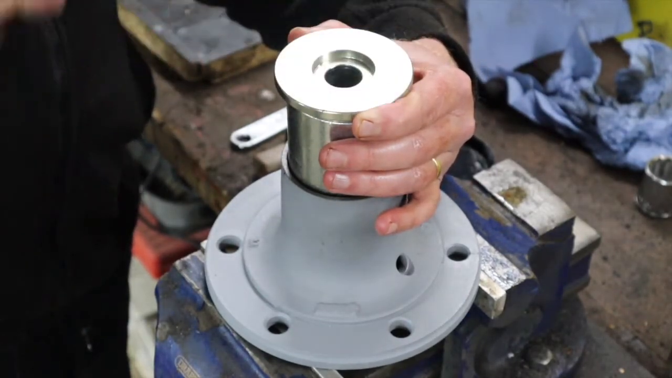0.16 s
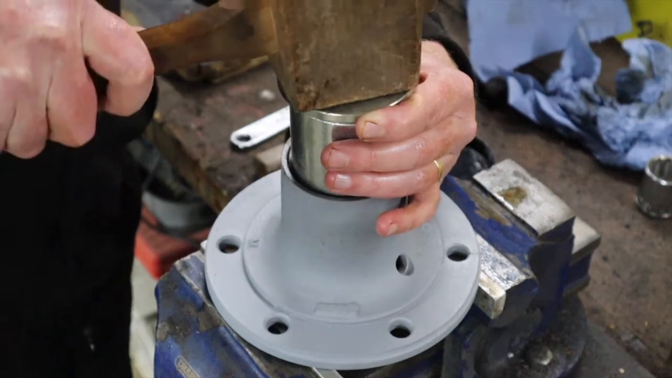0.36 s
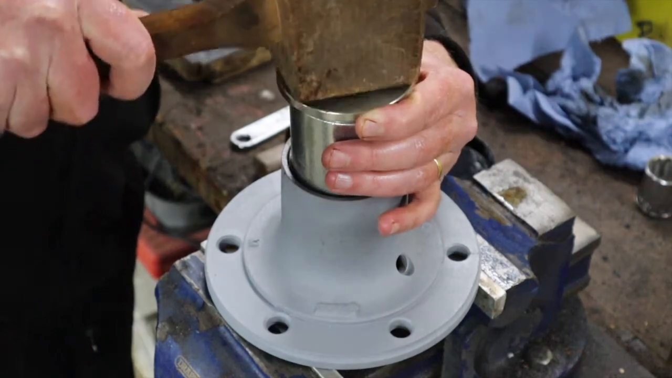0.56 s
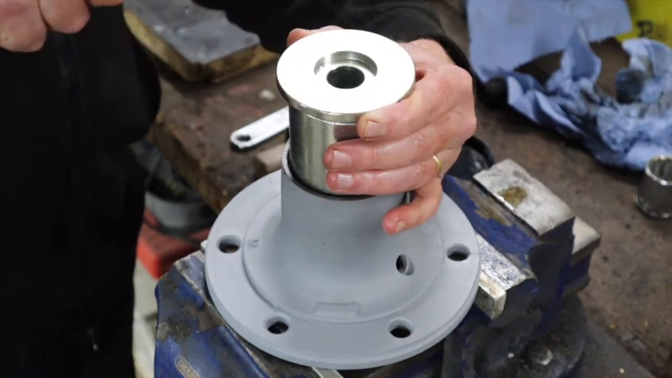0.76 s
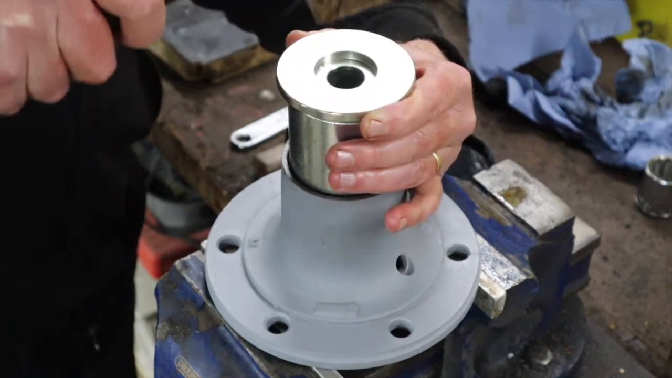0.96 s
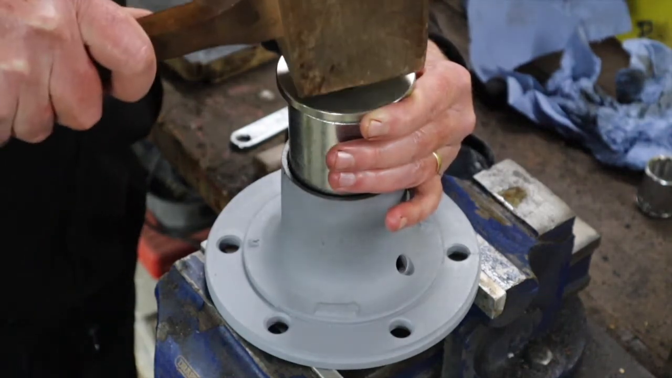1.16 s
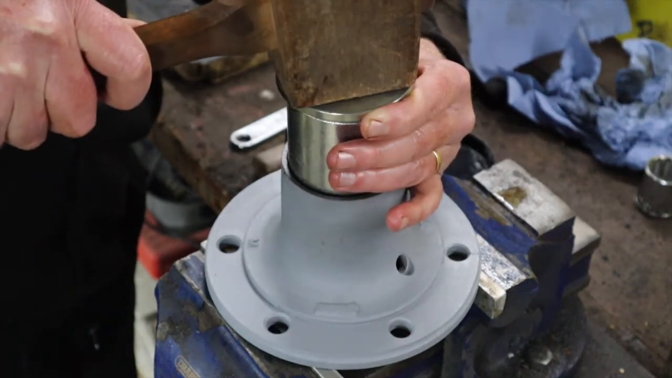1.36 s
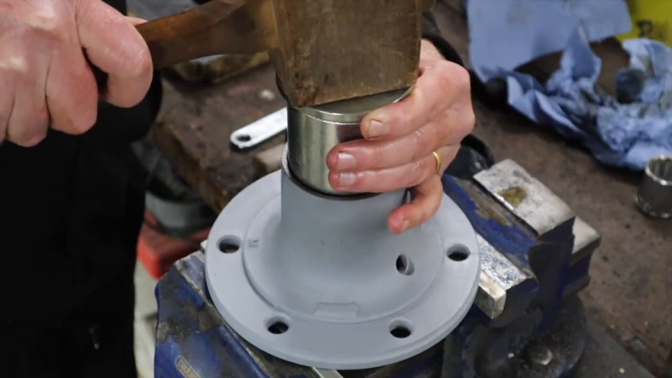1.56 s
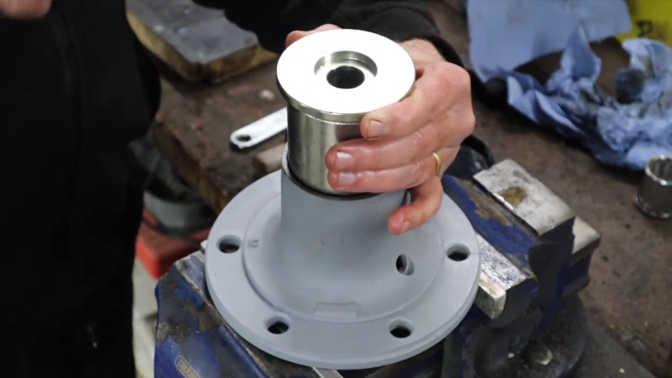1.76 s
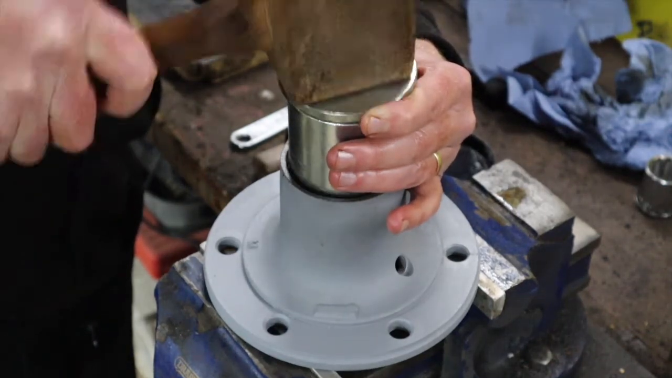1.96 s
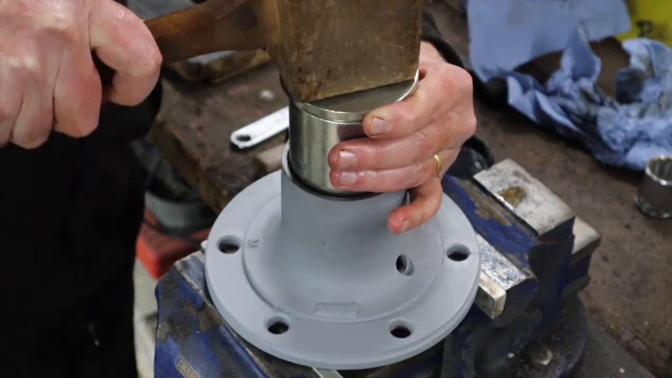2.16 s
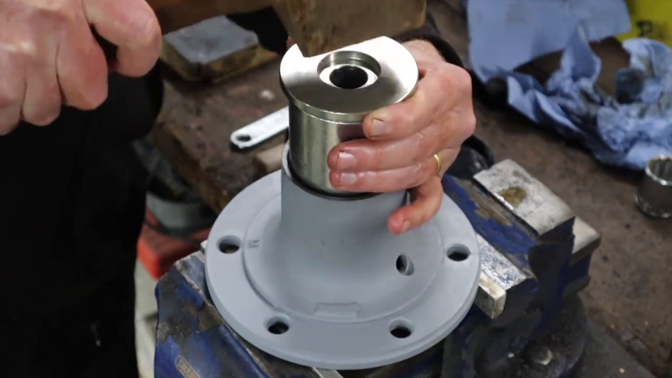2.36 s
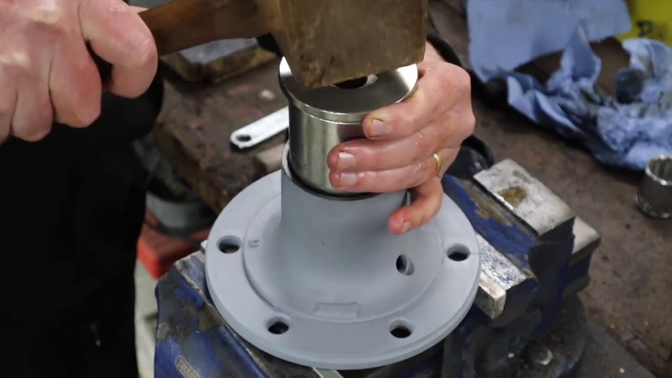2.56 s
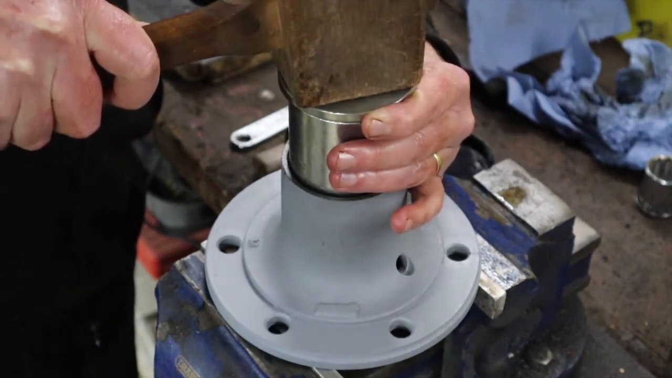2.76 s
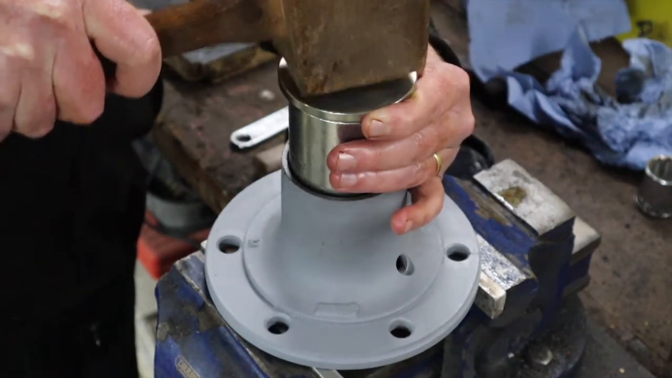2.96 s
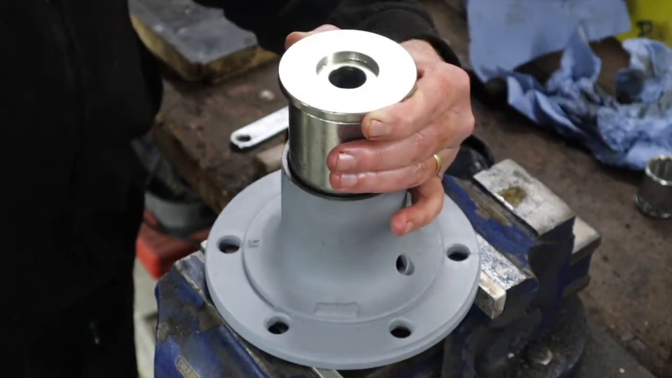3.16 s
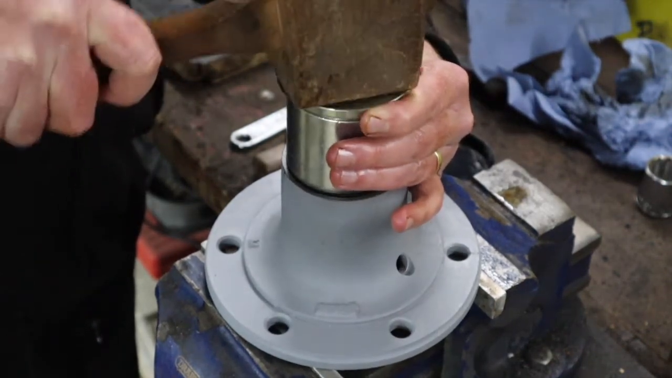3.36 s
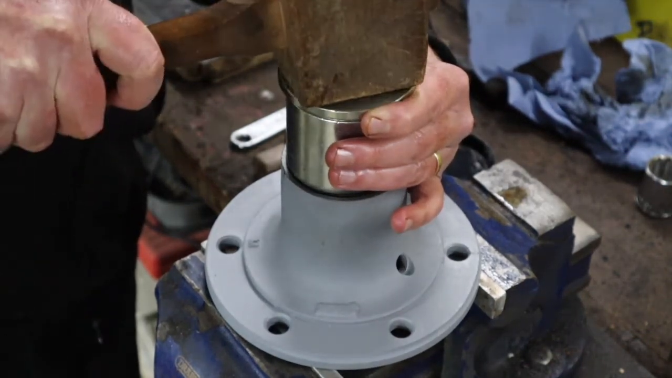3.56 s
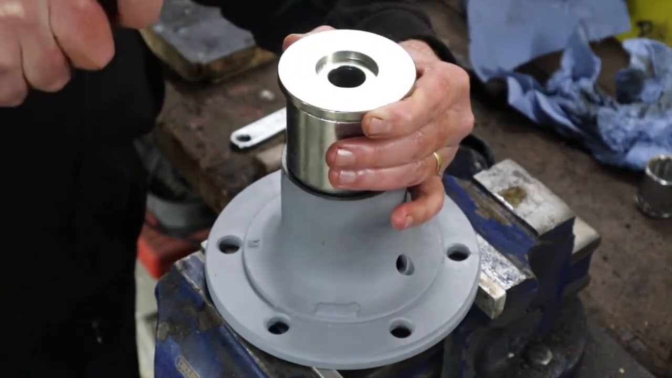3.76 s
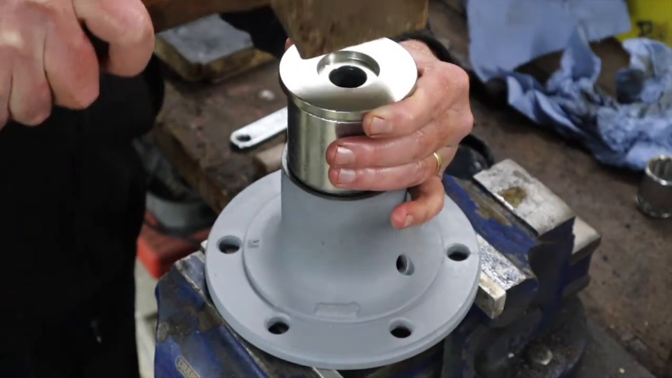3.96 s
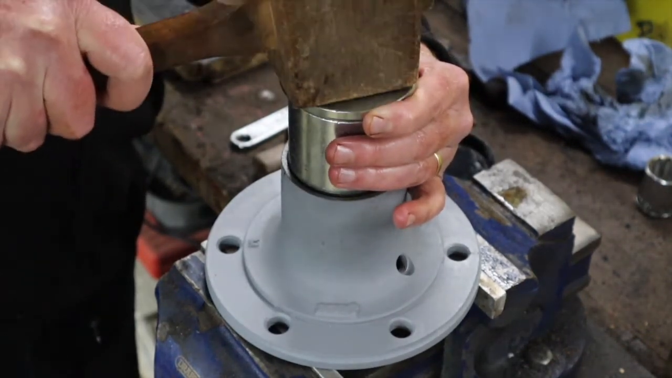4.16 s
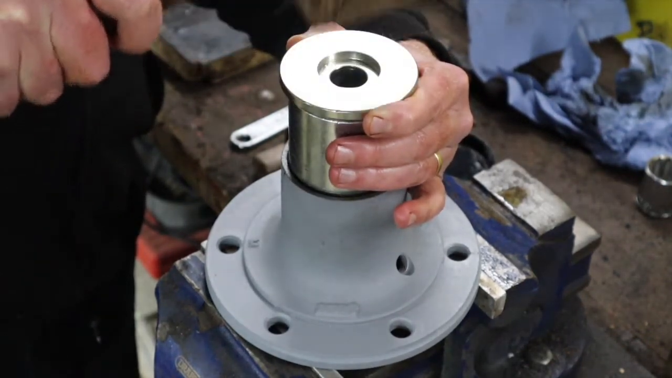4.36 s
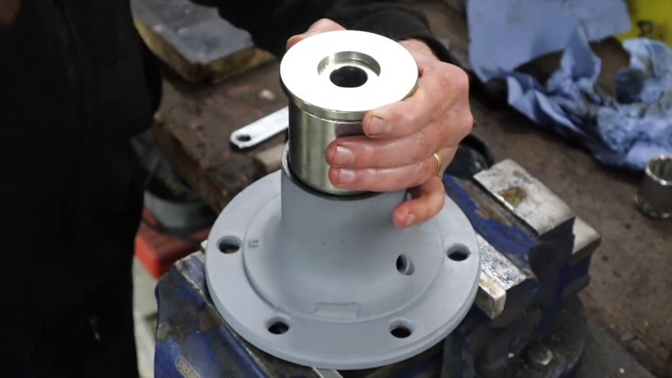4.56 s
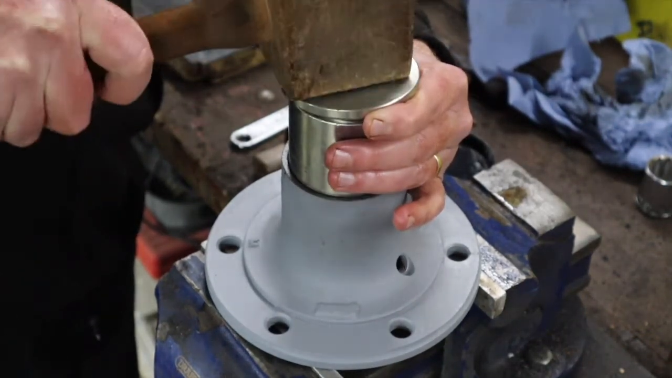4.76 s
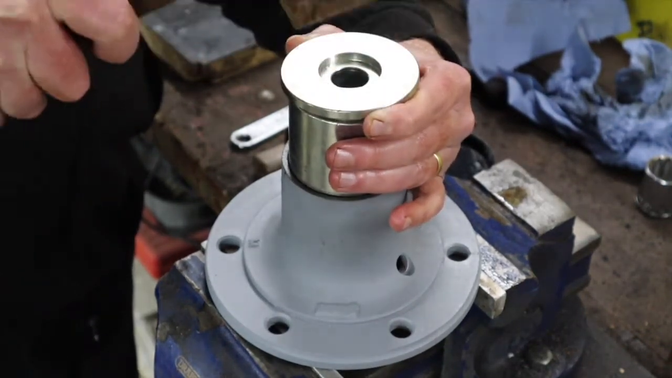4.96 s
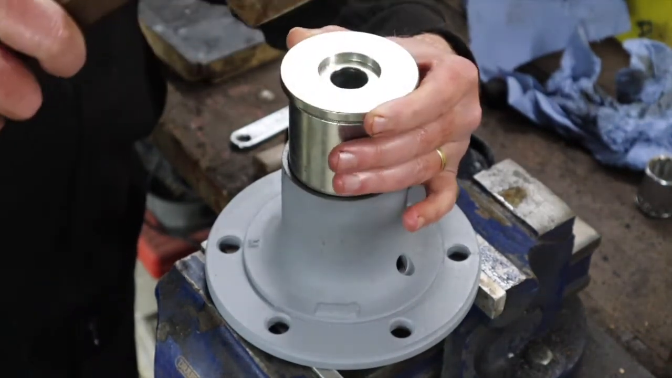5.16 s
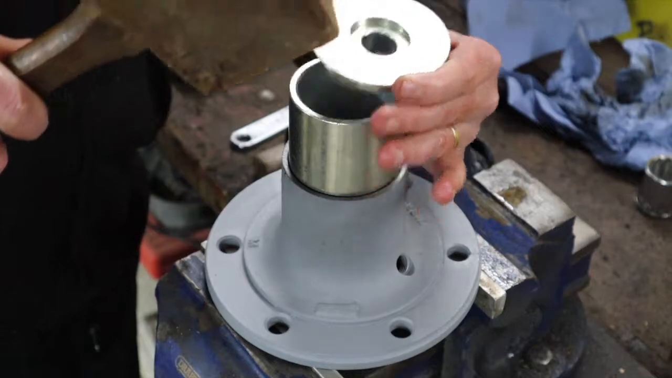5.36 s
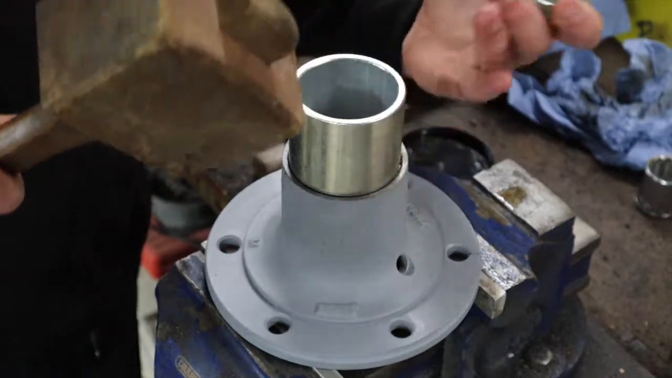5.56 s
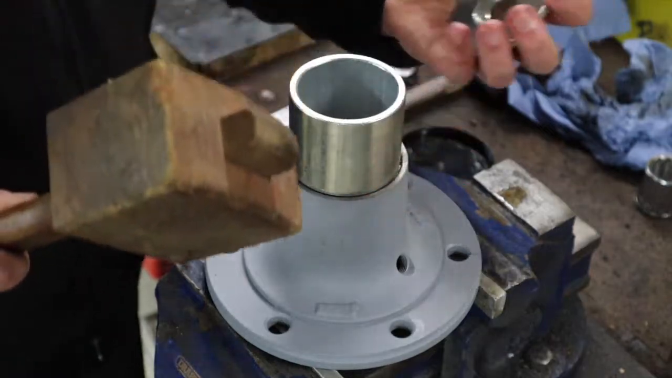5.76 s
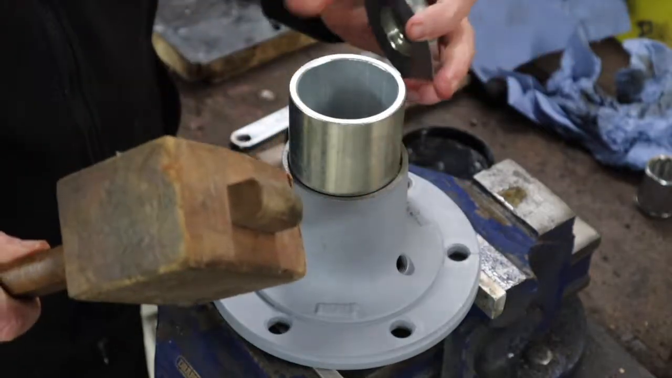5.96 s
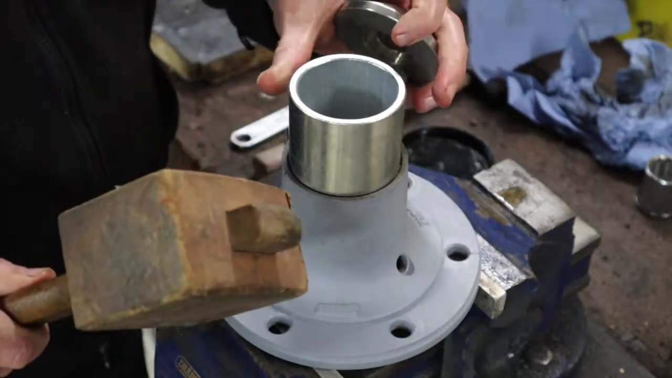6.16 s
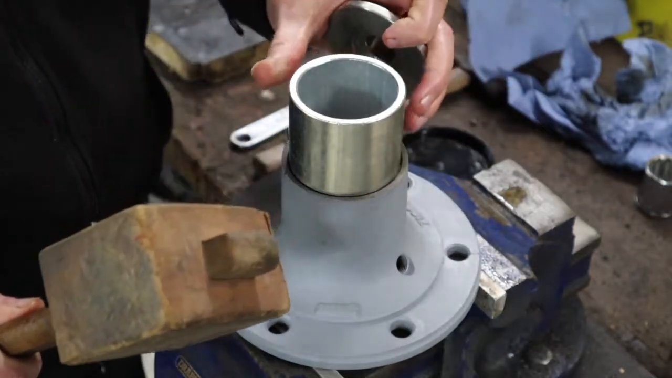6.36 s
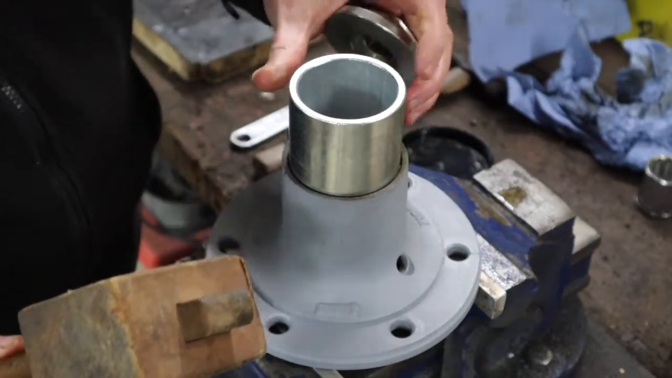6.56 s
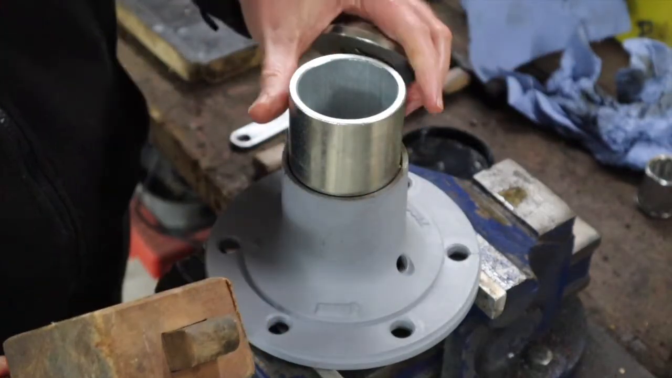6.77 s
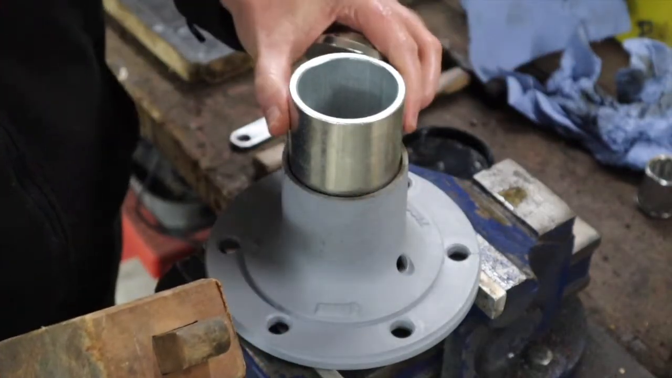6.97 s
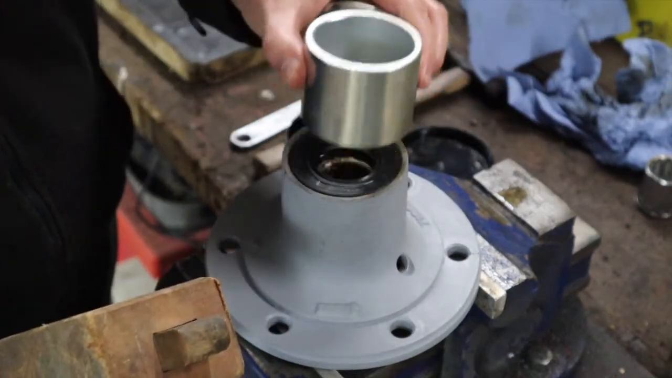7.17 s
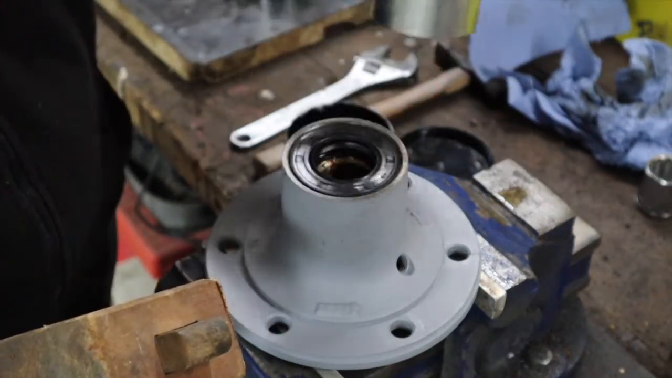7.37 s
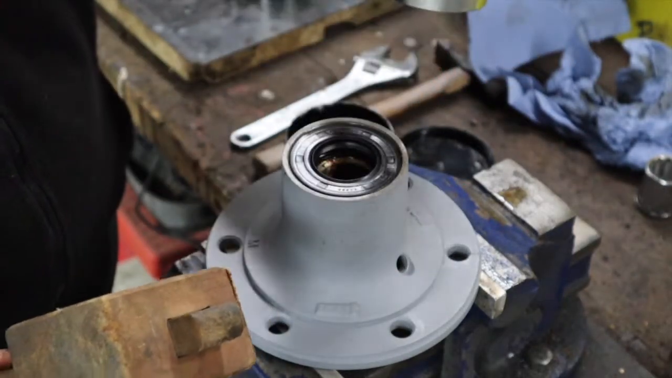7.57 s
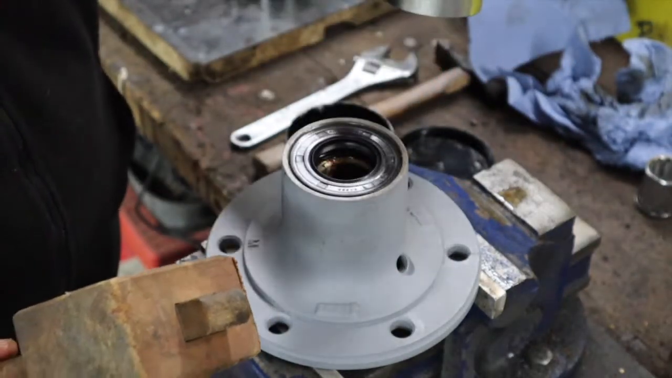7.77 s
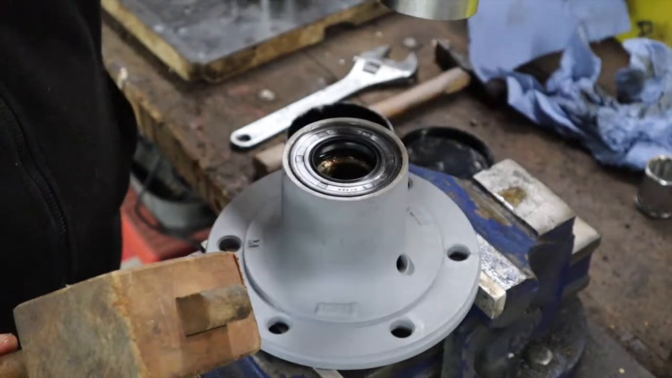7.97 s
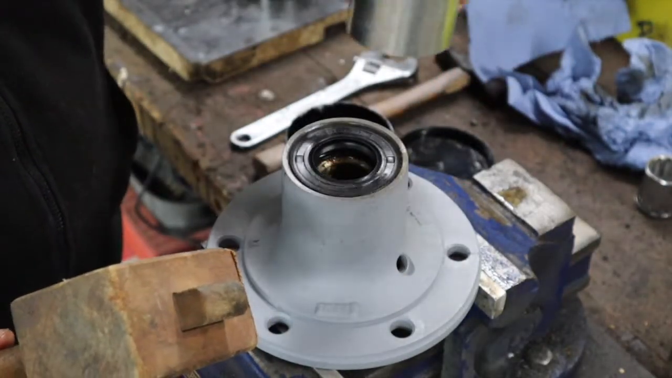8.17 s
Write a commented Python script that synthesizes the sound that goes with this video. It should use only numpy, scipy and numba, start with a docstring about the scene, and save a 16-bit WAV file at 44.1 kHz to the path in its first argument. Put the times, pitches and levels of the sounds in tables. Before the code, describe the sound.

Close and mono, heavy wood-on-steel blows burst out loud and slightly distorted, each ducking the background before the room decay swells up. Much softer taps fall between them. After the last double-edged hit, a loose steel cap clinks brightly, cloth rustles, a low motor tone hums briefly, and the steel tube comes free with a short rub and light ringing ticks. Faint mains hum and fan air remain.

```python
"""Workshop bench: a wooden mallet drives a tubular steel drift into a hub in a vice, heavy blows among light taps.
Contacts are damped modes plus coloured noise, each with a room answer; the loose drift then clinks and rubs a seal.
Sleeves rustle as shaped noise over mains hum, fan air and a brief motor tone.
Gain control ducks on heavy blows, just too late to stop clipping, and the room swells as it recovers."""
import sys
import numpy as np
from scipy import signal
from scipy.fft import rfft, irfft, next_fast_len
from scipy.io import wavfile
from numba import njit

SR = 44100
rng = np.random.default_rng(int(sys.argv[2]) if len(sys.argv) > 2 else 0)


def master(y):
    """Save y as 16-bit WAV."""
    cut = np.clip(np.atleast_2d(y).T, -1, 1)
    pcm = np.round(cut * 32767)  # scale
    wavfile.write(sys.argv[1], SR, pcm.astype(np.int16))


N = 362502

# hum of a mains-driven machine, before the background trim: pitch_hz, level_db
HUM_PARTIALS = [(49.9, -44), (150, -52), (249.7, -60), (350, -69.5), (450, -71)]
# fan air colour: freq_hz, level_db
AIR_SPECTRUM = [(20, -16), (60, 0.5), (110, -4.5), (200, -6.5), (330, -12), (600, -12), (860, -6),
                (1300, -17.5), (3300, -20.5), (6000, -34), (9000, -37.5), (15500, -36.5)]
# arm movements that rustle a sleeve: start_s, length_s, level_db
RUSTLES = [(0, .12, -71), (1.043, .15, -81), (3.049, .2, -71), (4.501, .13, -58), (6.2, 1.3, -68)]
# cloth colour: freq_hz, level_db
CLOTH_SPECTRUM = [(300, -24), (1500, -0.5), (4000, 2.5), (7000, -5), (10000, -12.5), (15000, -22)]
# mallet contacts: start_s, strength_db, cutoff_hz, drift_db, cap_db
BLOWS = [(0.2363, 17, 9000, -1, 4), (1.2940, -33, 1680, -11, 0), (1.9675, 21, 7420, -1.5, 1),
         (2.7515, -17, 4307, -11.5, -1.5), (2.7625, -31.5, 9000, 2, 0), (3.318, 20, 8570, 2, 2.5),
         (4.1011, -13.5, 3000, -5, 4.5), (4.6400, 21, 7700, -13, -4.5), (4.6629, 7, 8500, -4, -2.5)]
# wall ovals of the drift in pairs, ends opposed (1) or together (-1): pitch_hz, level_db, t60_s at grip 1, twist
DRIFT_MODES = [(3296, -11, .2, -1), (3325, -16, .07, -1), (4612, -15, .15, 1), (4690, -5, .025, 1),
               (9140, -19, .15, -1), (10955, -8, .11, 1), (11185, -23, .12, -1)]
# hub, seal, vice and bench, damped by mallet and hand: pitch_hz, level_db, t60_s at grip 1
HUB_MODES = [(58, -29, .25), (120, -31, .12), (610, -23, .035), (1610, -17, .015), (835, -14, .045),
             (925, -14, .045), (3370, -14, .045), (3480, -17, .035), (4810, -9, .022), (4990, -10, .03)]
# cap, driven against the tube: pitch_hz, level_db, t60_s at grip 1
CAP_MODES = [(2741, 0, 0.027), (2850, -8.5, 0.05), (2996, -13, 0.0097), (3324, -2, 0.038),
             (6466, -6.5, 0.017), (10960, -6, 0.06)]
# colour of the dense, short-lived modes: freq_hz, level_db
CRACK_SPECTRUM = [(25, -4), (90, -1.5), (300, -3), (1200, -1.5), (2400, 1), (4000, -1.5), (6500, -5.5),
                  (9000, -10), (15000, -21)]
# room decay: freq_hz, t60_s
ROOM_DECAY = [(80, .75), (400, .65), (1000, 0.55), (3000, 0.6), (6500, 0.52), (11000, 0.36), (16000, 0.39)]
# steel touching steel: start_s, strength_db, edge_db, twist_db
CLINKS = [(5.1732, -36, -22, 0), (5.1782, -13.5, -7.5, 2.5), (7.008, -42.5, -15, -1),
          (7.0324, -20, -28.5, -20.5), (7.0426, -20, -42, 12.5), (7.0496, -22, -38, 8)]
# drift leaving the seal: freq_hz, level_db
RUB_SPECTRUM = [(60, -16.5), (300, -11), (550, -4), (1000, -8.5), (2000, -29), (6000, -35), (14000, -58)]

MOTOR_HZ = 74.8
CLOTH_REST_DB = -76.5  # clothes between movements
RUSTLE_ATTACK_S, RUSTLE_RELEASE_SHARE = 0.066, 0.6  # release as a share of the rustle's length
CLEAN_HIT_HZ, EDGE_DB_PER_OCTAVE = 7900, 20.5  # softer contacts than a clean hit lose their sharp edge
DRIVE_FROM_DB = -5.5  # strength that sets the cap ringing and the bench moving
HUB_DB, HUB_DAMPING_DB_PER_DB = 6, 0.37  # hub share, and its loss per dB of strength as the mallet presses
THUD_DB, THUD_S = -11, 0.006
CONTACT_RISE_S = 0.00026
CLINK_CUTOFF_HZ = 11400
MODE_GRIP, SEATED_GRIP, LOOSE_GRIP = 0.89, 1.9, 0.94  # decay-rate factors
TOP_HZ, TOP_SLOPE_HZ = 15900, 600  # centre and width of the final treble cut


def amp(db):
    """Decibels to gain."""
    return 10 ** (np.asarray(db) / 20)


def unit(x):
    """Scale to rms 1."""
    return x / np.sqrt(np.mean(x ** 2) + 1e-20)


def along(points, hz):
    """Read (freq_hz, value) points on a log frequency axis."""
    point_hz, values = np.transpose(points)
    return np.interp(np.log(hz + 1), np.log(point_hz + 1), values)


def fade(t, t60_s):
    """Exponential decay of 60 dB in t60_s."""
    return amp(-60 * t / t60_s)


def filtered(x, response):
    """Multiply the spectrum of x by a response of frequency."""
    size = next_fast_len(len(x) + 8192)  # padded against wrap-around
    spectrum = rfft(x, size) * response(np.fft.rfftfreq(size, 1 / SR))
    return irfft(spectrum, size)[:len(x)]


def noise(spectrum, size):
    """Coloured noise of rms 1."""
    white = rng.standard_normal(size)
    return unit(filtered(white, lambda hz: amp(along(spectrum, hz))))


def add(track, start_s, sound):
    """Mix a sound in at start_s."""
    start = round(start_s * SR)
    track[start:start + len(sound)] += sound[:N - start]


def sine(pitch_hz, t, phase_cycles=0.0):
    """Sine at the given pitch and phase."""
    return np.sin(2 * np.pi * (pitch_hz * t + phase_cycles))


def background(motor_db=-52, motor_start_s=5.95, motor_stop_s=7.4, motor_ramp_s=0.17, trim_db=-3.5, air_db=-55.5):
    """Steady mains partials and fan noise; a motor tone ramps in and out at fixed pitch."""
    t = np.arange(N) / SR
    hum = sum(amp(level_db) * np.sqrt(2) * sine(pitch_hz, t, rng.random()) for pitch_hz, level_db in HUM_PARTIALS)
    motor_gate = np.clip(np.minimum(t - motor_start_s, motor_stop_s - t) / motor_ramp_s, 0, 1)
    motor = amp(motor_db) * np.sqrt(2) * sine(MOTOR_HZ, t) * motor_gate
    return amp(trim_db) * (hum + motor) + amp(air_db) * noise(AIR_SPECTRUM, N)


def sleeves():
    """Cloth noise swells as an arm moves: quick rise, hold, fall."""
    t = np.arange(N) / SR
    level = amp(CLOTH_REST_DB)
    for start_s, length_s, level_db in RUSTLES:
        rise = (t - start_s) / RUSTLE_ATTACK_S
        fall = 1 - (t - start_s - length_s) / (RUSTLE_RELEASE_SHARE * length_s)
        level = level + amp(level_db) * np.clip(np.minimum(rise, fall), 0, 1)
    return level * noise(CLOTH_SPECTRUM, N)


def contact(hz, cutoff_hz, edge_db, edge_hz=6000):
    """A long contact excites less treble; only a sharp edge reaches the top octaves."""
    edge = 1 / (1 + (edge_hz / (hz + 1)) ** 12)
    return amp(edge_db * edge) / np.sqrt(1 + (hz / cutoff_hz) ** 3)


def ring(modes, t, touch, grip=MODE_GRIP, scatter_db=2.5):
    """Damped modes, rescattered in strength at every contact; a firmer grip shortens them."""
    onset = 1 - np.exp(-(t / 0.0005) ** 2)
    total = np.zeros(len(t))
    for pitch_hz, level_db, t60_s in modes:
        strength = amp(level_db + scatter_db * rng.standard_normal()) * contact(pitch_hz, *touch)
        total += strength * fade(t * grip, t60_s) * sine(pitch_hz, t, rng.random())
    return onset * total


def drift(t, touch, twist_db, grip):
    """A contact near one rim favours the modes whose two ends move in opposition."""
    modes = [(pitch_hz, level_db + twist * twist_db, t60_s)
             for pitch_hz, level_db, t60_s, twist in DRIFT_MODES]
    return ring(modes, t, touch, grip)


def crack(envelope, touch, low_hz):
    """Noise for the dense, short-lived modes; small parts radiate no bass."""
    return filtered(envelope * noise(CRACK_SPECTRUM, SR),
                    lambda hz: contact(hz, *touch) * hz / np.hypot(hz, low_hz))


def thud(t):
    """The blow shoves the bench down once, and it springs back."""
    return amp(THUD_DB) * (1 - t / THUD_S) * np.exp(-t / THUD_S)


def reverberate(x, tail_db, early_db, early_t60_s=0.17, gap_s=0.004):
    """Shape steady noise into quick bench reflections and a room tail."""
    hz, frame_s, bins = signal.stft(x, SR, nperseg=256)
    tail_t60_s = along(ROOM_DECAY, hz)[:, None]

    def power(level_db, t60_s):
        """Decaying power, scaled so that level_db sets its total energy."""
        return (amp(level_db) * fade(frame_s, t60_s)) ** 2 * 2 * np.log(1000) / (t60_s * SR)

    shape = np.sqrt(power(tail_db, tail_t60_s) + power(early_db, early_t60_s))
    echo = signal.istft(bins * shape, SR, nperseg=256)[1][:SR]
    return echo * (1 - np.exp(-(np.arange(SR) / (gap_s * SR)) ** 2))


def strike(metal, touch, low_hz, crack_db, crack_t60_s, tail_db, early_db=-9):
    """A crack and a metal ring, each with its answer from the room."""
    t = np.arange(SR) / SR
    burst = amp(crack_db) * fade(t, crack_t60_s)
    # the room gathers the crack from all directions: an even wash
    wash = reverberate(crack(np.linalg.norm(burst), touch, low_hz), tail_db, early_db)
    room = reverberate(rng.standard_normal(SR), tail_db, early_db)
    echo = signal.fftconvolve(metal, room)[:SR]
    rise = 1 - np.exp(-(t / CONTACT_RISE_S) ** 2)
    return rise * crack(burst, touch, low_hz) + metal + wash + echo


def mallet():
    """Wood cracks on the cap; hub and drift ring, and hard blows also ring the cap and shove the bench."""
    out, t = np.zeros(N), np.arange(SR) / SR
    for start_s, strength_db, cutoff_hz, drift_db, cap_db in BLOWS:
        edge_db = EDGE_DB_PER_OCTAVE * min(np.log2(cutoff_hz / CLEAN_HIT_HZ), 0)
        touch = cutoff_hz, edge_db
        driven = amp(strength_db) / (amp(strength_db) + amp(DRIVE_FROM_DB))
        seated = amp(drift_db) * drift(t, touch, twist_db=0, grip=SEATED_GRIP)
        cap = amp(cap_db) * driven * ring(CAP_MODES, t, touch)
        hub = amp(HUB_DB - HUB_DAMPING_DB_PER_DB * strength_db) * ring(HUB_MODES, t, touch)
        blow = strike(hub + seated + cap, touch, low_hz=13.0, crack_db=2.0, crack_t60_s=0.027, tail_db=-11.0)
        add(out, start_s, amp(strength_db) * (blow + driven * thud(t)))
    return out


def clinks():
    """The loose drift rings as its cap, and later the hub's rim, touches it."""
    out, t = np.zeros(N), np.arange(SR) / SR
    for start_s, strength_db, edge_db, twist_db in CLINKS:
        touch = CLINK_CUTOFF_HZ, edge_db
        metal = drift(t, touch, twist_db, grip=LOOSE_GRIP)
        clink = strike(metal, touch, low_hz=1200, crack_db=-6.5, crack_t60_s=0.034, tail_db=-12.5)
        add(out, start_s, amp(strength_db) * clink)
    return out


def seal(start_s=7.0065, length_s=0.044, level_db=-36):
    """Friction noise as the drift rubs briefly on the rubber seal when pulled free."""
    out, t = np.zeros(N), np.arange(SR) / SR
    envelope = np.sqrt(np.abs(np.sin(np.pi * np.minimum(t / length_s, 1))))
    rub = noise(RUB_SPECTRUM, SR) * envelope
    room = reverberate(rng.standard_normal(SR), tail_db=-8, early_db=-11)
    echo = signal.fftconvolve(rub, room)[:SR]
    add(out, start_s, amp(level_db) * (rub + echo))
    return out


def scene():
    """The work at the bench over the sound of the workshop."""
    return np.array([mallet() + clinks() + seal() + sleeves() + background()])


@njit
def follow(allowed, attack, hold, step):
    """Gain that dives towards the allowed value, holds, then climbs back in equal steps."""
    out, gain, wait = np.empty_like(allowed), 1.0, 0.0
    for i in range(len(allowed)):
        wait -= 1
        if allowed[i] < gain:
            gain += attack * (allowed[i] - gain)
            wait = hold
        elif wait < 0:
            gain = min(gain + step, 1.0)
        out[i] = gain
    return out


def record(dry, limit_db=-3.0, attack_s=0.0006, hold_s=0.041, release_s=0.15, memory_s=0.76, slow_share=0.86):
    """Gain control ducks a little too late, so the onset of a heavy blow clips; the top is cut."""
    allowed = amp(limit_db) / (np.abs(dry[0]) + 1e-9)
    # release_s is the climb from gain 0 to 1
    gain = follow(allowed, 1 / (attack_s * SR), hold_s * SR, 1 / (release_s * SR))
    # a smoothed share of the duck is added and returns slowly
    leak = 1 / (memory_s * SR)
    slow_db = slow_share * signal.lfilter([leak], [1, leak - 1], 20 * np.log10(gain))
    clipped = np.clip(dry[0] * gain * amp(slow_db), -1, 1)
    return filtered(clipped, lambda hz: np.clip((TOP_HZ - hz) / TOP_SLOPE_HZ + 0.5, 0, 1))[None]


dry = scene()
out = record(dry)
master(out)
```